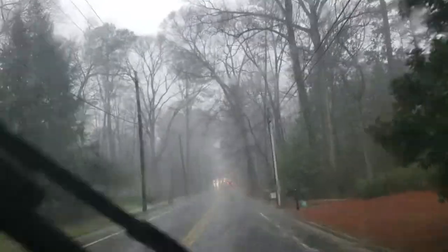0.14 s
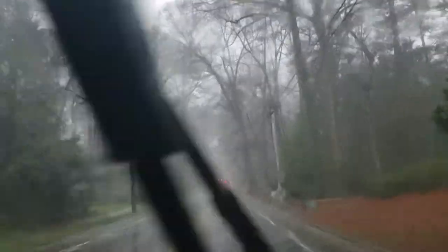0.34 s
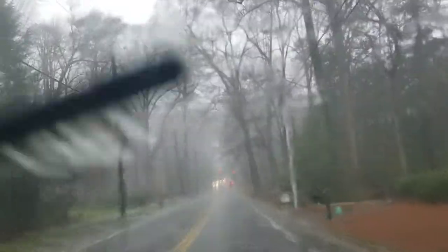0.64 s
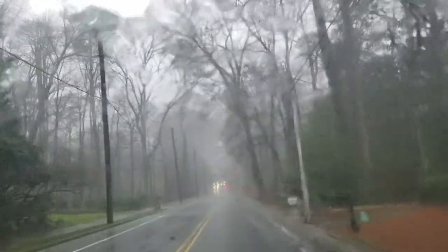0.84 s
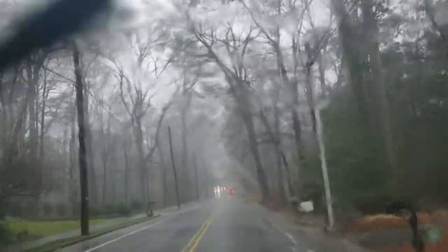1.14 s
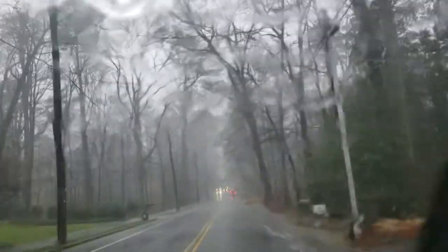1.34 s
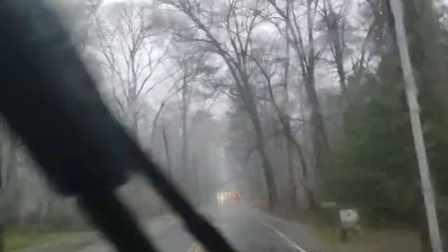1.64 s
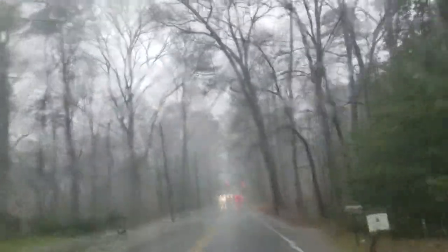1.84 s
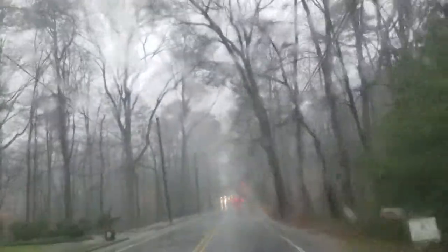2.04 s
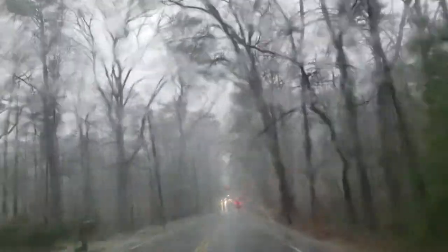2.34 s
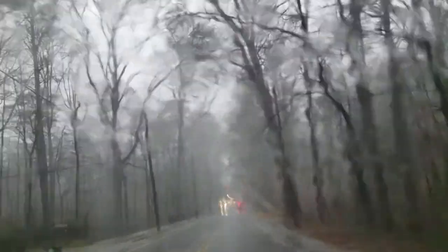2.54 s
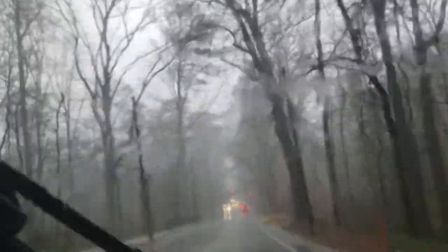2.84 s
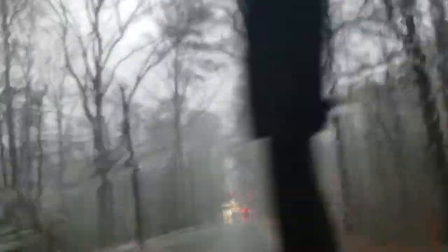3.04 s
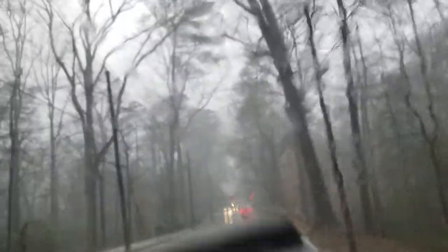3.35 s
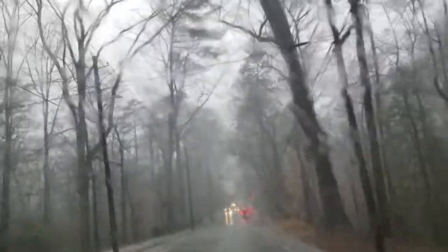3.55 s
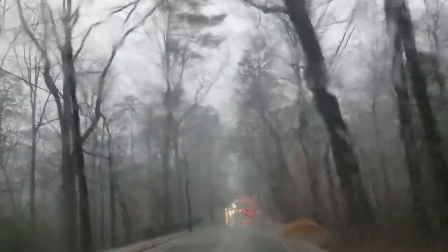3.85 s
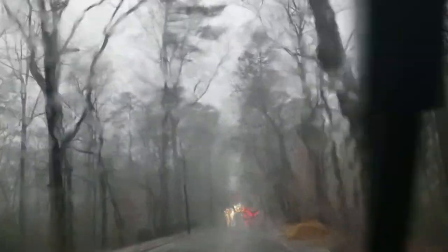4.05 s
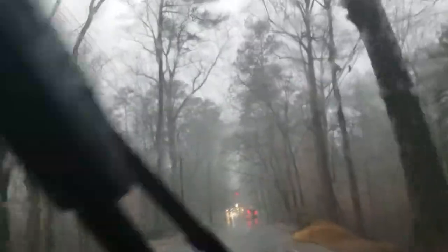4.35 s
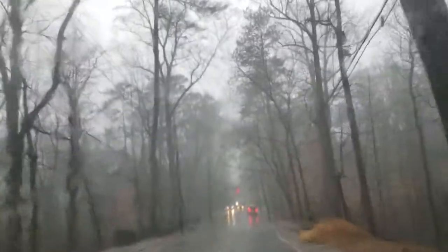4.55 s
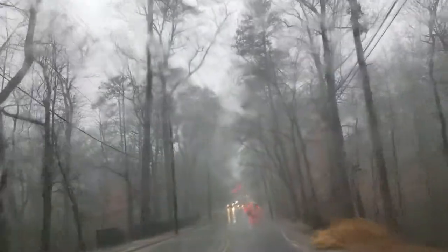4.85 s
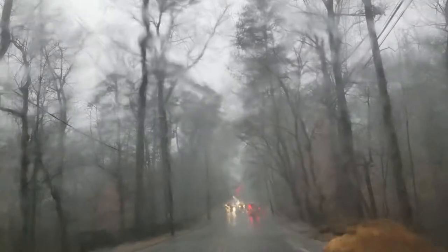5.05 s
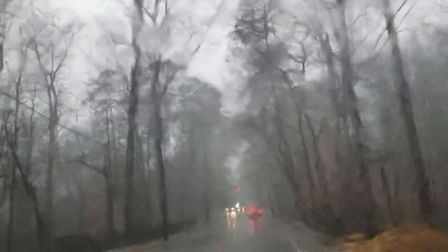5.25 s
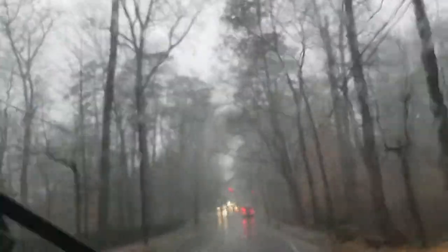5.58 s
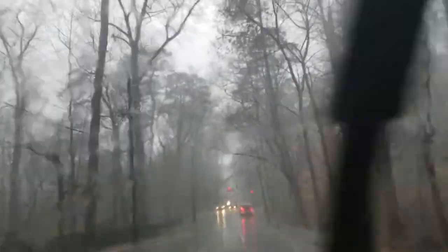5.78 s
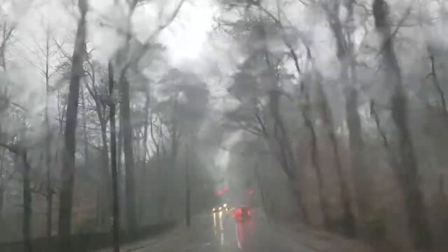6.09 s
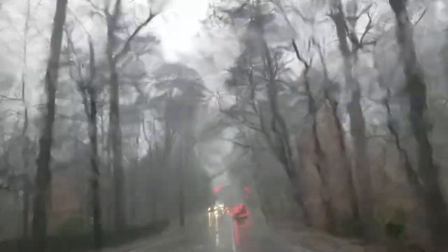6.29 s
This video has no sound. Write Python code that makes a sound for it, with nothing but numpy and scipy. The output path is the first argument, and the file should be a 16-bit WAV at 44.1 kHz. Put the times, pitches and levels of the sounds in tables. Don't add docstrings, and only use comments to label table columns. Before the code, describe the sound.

Heard inside a car driving a wet wooded road: fine rain patters in gusts on the windshield over boomy road rumble and tyre hum. A faint wiper blade groan comes early, then soft low wiper knocks. From about two and a half seconds fat drops crack sharply on glass and thud on the roof, thickly, until the end thins out as a low drone sinks with slowing speed.

```python
import sys
import numpy as np
from scipy import signal
from scipy.fft import irfft
from scipy.io import wavfile
from scipy.ndimage import uniform_filter1d, minimum_filter1d

SR = 44100
rng = np.random.default_rng(int(sys.argv[2]) if len(sys.argv) > 2 else 0)


def gain_from_db(level_db):
    decades = np.asarray(level_db, float) / 20
    return 10 ** decades


def int16_out(signal):
    q = np.round(np.clip(np.atleast_2d(signal).T, -1, 1) * 32767)
    wavfile.write(sys.argv[1], SR, q.astype(np.int16))


N = 283122
TIME = np.arange(N) / SR
PORT_LAG = 22

# f/Hz, density/dB per Hz
GLASS_COLOUR = [(150, -59), (250, -9.5), (379, -10), (683, -9.5), (1210, -10), (1710, -10.5), (2980, -4.5),
                (4430, -7), (5460, -17.5), (7450, -17.5), (9180, -21.5), (12100, -12.5), (13600, -20),
                (15700, -17)]


def patter(per_s=700, spread_db=4.5, wash_db=-6):
    # t/s, level/dB
    shower = [(0, -37), (.39, -32.5), (.45, -42.5), (.72, -39.5), (.78, -44.5), (.94, -46), (1.03, -41),
              (2.38, -36), (2.9, -34.5), (3.0, -41), (5.03, -38.5), (5.11, -32), (5.62, -33), (5.73, -38.5),
              (5.81, -31), (6.09, -28.5), (6.2, -39), (6.42, -39.5)]
    # t/s, swell/dB, half length/s
    sheets = [(0.56, 4.5, 0.12), (0.474, -3.5, 0.044), (.9, -2, 0.062), (1.34, -5.5, 0.043),
              (1.402, 3, 0.031), (3.507, -2, .05), (1.763, 3, 0.095), (2.09, 3.5, 0.095), (2.49, 7, 0.1),
              (2.92, 1, 0.1), (3.107, 6, .11), (3.342, 8, 0.08), (3.692, 1.5, 0.19), (3.906, 7, 0.048),
              (4.036, 6.5, 0.11), (4.484, 8, .05), (4.62, 4.5, .1), (4.718, 3.5, 0.086), (4.92, 9, 0.14),
              (5.328, 2, 0.28)]
    level_db = follow(shower)[0]
    for s, swell_db, half_s in sheets:
        level_db = level_db + swell_db * np.clip(1 - abs(TIME - s) / half_s, 0, 1)

    shapes = splats(count=24, crack_s=0.0011, ring_db=-10.5, spot_db=3)
    size = gain_from_db(spread_db * np.minimum(rng.exponential(1, N), 3))
    hits = size * (rng.random(N) < per_s / SR)
    spot = rng.integers(0, len(shapes), N)
    near = np.zeros((2, N))
    for k, shape in enumerate(shapes):
        near += signal.oaconvolve((hits * (spot == k))[None], shape, axes=1)[:, :N]
    wash = steady(GLASS_COLOUR, patchy_db=2.44, lag=PORT_LAG)
    body, fizz = split(evened(near) + gain_from_db(wash_db) * wash, hz=5000)
    drum, body = split(body, hz=1080)

    flicker_db, span = 1.5, round(0.0035 * SR)
    clumps = uniform_filter1d(rng.standard_normal(N), size=span)
    clumps = evened(uniform_filter1d(clumps, size=span))
    fizz = fizz * gain_from_db(flicker_db * clumps)
    body = body * gain_from_db(0.56 * flicker_db * clumps)

    drum_db = 1 - 0.1 * (level_db + 29)
    bright_db = 0.28 + 0.17 * (level_db + 47.5)
    return gain_from_db(level_db + 3.0) * (body + gain_from_db(drum_db) * drum + gain_from_db(bright_db) * fizz)


def fat_drops(gain_db=-3.5, thud_db=-8, thud_spread_db=6.0):
    s, peak_db, bright_db = np.transpose(all_drops())[..., None, None]
    shapes = splats(count=len(s), crack_s=.0006, ring_db=-20, spot_db=3)
    body, fizz = split(shapes, hz=5200)
    thud, body = split(body, hz=1085)
    body, fizz, thud = (part / part[..., :200].std((1, 2), keepdims=True) for part in (body, fizz, thud))

    place, depth = rng.random((2, len(s), 1, 1)) - .5
    crack = body + gain_from_db(bright_db) * fizz
    thud = thud * gain_from_db(thud_db - 0.01 * (peak_db + 22) + thud_spread_db * depth)
    pan = gain_from_db(np.array([[2], [-2]]) * place)
    peak = abs(crack.mean(1, keepdims=True)).max(2, keepdims=True)
    drops = (crack + thud) * pan * gain_from_db(peak_db + gain_db) / peak
    out = np.zeros((2, N))
    for start_s, drop in zip(s.ravel(), drops):
        add(out, start_s, drop)
    return out


def all_drops():
    # t/s, peak/dB, brightness/dB
    fat = [(.4445, -13.5, -1), (.5745, -14.5, 0.5), (.6369, -16, 2), (.8805, -17, 4), (1.471, -21, 11),
           (1.7019, -20, 15), (2.6154, -3, 3), (2.8117, -9, 4.5), (3.0214, -8.5, -0.5),
           (3.5283, -5.5, 3), (3.6784, -0.5, 5), (3.8949, -12.5, 4.5), (4.092, -7.5, -0.5),
           (4.1334, -12, 3), (4.2644, -4.5, 6.5), (4.4449, -7, 1.5), (4.6767, -6, 5),
           (4.7695, -11, 1.5), (4.953, -6, 7), (5.1044, -7, -1), (5.1217, -6, 7), (5.2893, -12, 1),
           (5.3948, -7.5, 0), (5.4165, -9, 9), (5.5584, -9, 6), (5.6707, -8.5, 15), (5.7946, -6.5, .5),
           (5.8146, -0.5, -3.5), (5.9493, -22, -3), (6.277, -15, 9),
           (0.178, -11, -9), (.666, -12.5, 0), (0.6904, -18, -3), (0.7228, -14.5, -4),
               (1.0276, -17.5, -5), (2.3348, -6.5, -0.5), (2.7032, -5.5, -3), (2.767, -16, -2.5),
               (2.9119, -8.5, -6), (3.314, -12, -11), (3.445, -8.5, -7), (3.6084, -10, -3),
               (3.648, -7.5, -8), (3.779, -14.5, 0.5), (3.973, -8, -7), (4.0407, -8, -4.5),
               (4.0727, -17, -6), (4.1775, -15, -7.5), (4.318, -9.5, 0.5), (4.3861, -10, 2),
               (4.544, -14.5, -5), (4.5794, -6.5, -4), (4.7972, -14, -5), (4.8939, -5, -1.5),
               (4.9396, -16, -7), (5.0404, -12, -8), (5.091, -15, -21), (5.4328, -8, -6.5),
               (5.9072, -7.5, -5), (6.3835, -16, 1)]
    # t/s, peak/dB, brightness/dB, gap to second half/s
    twins = [(2.4762, -6, 7.5, 0.0059), (2.5952, -9.5, -6, 0.0067), (2.6315, -12, -5.5, 0.0067),
             (2.8396, -12, -2.5, .005), (2.8872, -12, -3, 0.0093), (2.963, -10.5, -10, .0077),
             (3.7058, -9.5, 0.5, .006), (3.993, -11, -2, 0.008), (4.4689, -6.5, -1.5, .0072),
             (4.9251, -11.5, -4, .0057), (4.9724, -12, -2, 0.0097), (5.6571, -5, 3, 0.0055),
             (5.7498, -7.5, 4.5, 0.0059)]
    # t/s, peak/dB
    light = [(.017, -23), (0.7073, -18), (0.7387, -18.5), (.792, -19.5), (0.9603, -24), (2.9218, -11.5),
             (3.027, -17), (3.3492, -19), (3.389, -18.5), (3.563, -16), (3.6011, -19), (3.738, -19),
             (3.7672, -21), (3.7956, -13), (3.9481, -17), (3.9593, -14.5), (4.1472, -13.5), (4.204, -19),
             (4.2196, -16.5), (4.2788, -20), (4.437, -17), (4.631, -17), (4.746, -20), (5.2645, -22),
             (5.3254, -8), (5.378, -8), (5.46, -11), (5.5796, -30), (5.831, -18), (5.978, -24)]
    # t/s, rate/dB
    canopy = [(0, -6), (.8, -9), (2.2, -12), (2.6, 0), (5.0, 0.5), (5.2, -4), (6.42, -9)]
    second_db, strays, stray_db = 1.5, 40, -22
    halves = [(s + k * gap_s, db + k * second_db, bright_db)
              for s, db, bright_db, gap_s in twins for k in (0, 1)]
    drips = [(s, db, 12.0 * (tone - .5)) for (s, db), tone in zip(light, rng.random(len(light)))]
    when, size, tone = rng.random((strays, 3)).T
    fallen = np.cumsum(gain_from_db(follow(canopy)[0]))
    stray_s = np.interp(when * fallen[-1], fallen, TIME)
    stray_rows = list(zip(stray_s, stray_db + 3.4 * (size - .5), 9.0 * (tone - .5)))
    return fat + halves + drips + stray_rows


def splats(count, crack_s, ring_db, spot_db):
    # f/Hz, t60/s
    pane_t60 = [(300, 0.13), (1000, 0.086), (3000, 0.083), (8000, 0.054), (15000, 0.049)]
    t = np.arange(2560) / SR
    hz, z = ports(GLASS_COLOUR, len(t), count=count, lag=PORT_LAG)
    modes = uniform_filter1d(rng.standard_normal((count, len(hz))), size=56, axis=1)
    z = z * gain_from_db(spot_db * evened(modes).T)
    edges_hz = np.geomspace(200, 20000, 7)
    out = np.zeros((2, len(t), count))
    for lo, hi in zip(edges_hz, edges_hz[1:]):
        band = irfft(z * ((hz >= lo) & (hz < hi))[:, None], axis=1)
        rise = 1 - np.exp(-t / (.9 * crack_s + .4 / lo))
        crack = np.exp(-t / (crack_s + 0.19 / lo))
        ring = gain_from_db(ring_db - 60 * t / read(pane_t60, np.sqrt(lo * hi)))
        out += band * (rise * (crack + ring))[:, None]
    return np.moveaxis(out, 2, 0)


def wiper(t60_s=0.16, rise_s=0.0027, clack_db=-12, clack_t60_s=0.038):
    # t/s, peak/dB, f/Hz
    knocks = [(1.379, -11.5, 102), (1.43, -15.5, 57), (1.47, -14.5, 97), (1.498, -10, 60), (1.553, -13, 85),
              (1.631, -15, 80.7), (1.919, -16.5, 75.2), (1.986, -14.5, 53.8), (2.119, -12, 57.5),
              (2.785, -13, 80.5), (2.81, -20, 59.2), (2.849, -11, 110), (2.889, -17, 56.5),
              (2.953, -11.5, 65.5), (3, -19, 78.3), (3.08, -12, 61), (3.129, -14, 49.2)]
    out, t = np.zeros((2, N)), np.arange(6000) / SR
    for s, db, hz in knocks:
        knock = np.sin(2 * np.pi * hz * t * (1 - 0.67 * t))
        knock = knock * (1 - np.exp(-t / rise_s)) * gain_from_db(-60 * t / t60_s)
        clack = sum(np.sin(2 * np.pi * mode_hz * t) for mode_hz in rng.uniform(202, 515, size=3))
        knock = knock + gain_from_db(clack_db - 60 * t / clack_t60_s) * (1 - np.exp(-t / 0.0025)) * clack
        add(out, s, gain_from_db(db) * knock / abs(knock).max() * gain_from_db([[1.2], [-1.2]]))
    return out


def groans(edge_s=0.018, sag=0.036):
    # start/s, length/s, f/Hz, level/dB
    rubs = [
        (0.24, .11, 251, -32),
        (0.625, 0.24, 252.7, -39.5),
    ]
    corners = []
    for s, length_s, hz, db in rubs:
        end_s, end_hz = s + length_s, hz * (1 - sag)
        corners += [(s - edge_s, hz, -60), (s, hz, db), (end_s, end_hz, db), (end_s + edge_s, end_hz, -60)]
    return hum(*follow(corners), width_hz=11, clean=4.6)


def tyres():
    # t/s, f/Hz, level/dB
    cavity = [(0, 151, -32), (.8, 151, -35), (2, 148.3, -30.5), (2.7, 153.4, -34.5), (4, 149, -31.5),
              (5.2, 152.9, -29.5), (5.6, 149.7, -31.5), (6.42, 148, -34)]
    return hum(*follow(cavity), width_hz=25.4, clean=0.85)


def driveline():
    # t/s, f/Hz, level/dB
    drone = [(3.4, 140.5, -62), (4.4, 137.9, -32.5), (5.3, 130, -27.5), (5.55, 129.2, -32.5),
             (5.75, 126.9, -25), (6.1, 122.1, -23.5), (6.42, 122.4, -25)]
    return hum(*follow(drone), width_hz=10, clean=4)


def hum(hz, db, width_hz, clean):
    r = np.exp(-np.pi * width_hz / SR)
    noise = rng.standard_normal((4, N))
    for _ in range(2):
        noise = signal.lfilter([1 - r], [1, -r], noise)
    a, b, c, d = noise
    wander = clean + evened(a) + 1j * evened(b)
    other = 0.38 * (evened(c) + 1j * evened(d))
    turn = np.exp(2j * np.pi * np.cumsum(hz) / SR)
    pair = np.array([1.25 * wander * turn, (wander * np.exp(.3j) + other) * 0.82 * turn])
    return gain_from_db(db) * evened(pair.real)


def road(steadied=0.62):
    # f/Hz, density/dB per Hz
    boom_colour = [(8.8, -38), (15, -29), (42, -5.5), (64, 2), (97, -5), (135, -12), (200, -25), (260, -50),
                   (440, -120)]
    # f/Hz, density/dB per Hz
    roar_colour = [(71, -9), (120, -1.5), (158, -5), (222, -7), (307, -11.5), (479, -22.5), (731, -25),
                   (932, -29), (1500, -47), (1950, -59), (3300, -120)]
    # t/s, roar level/dB
    roar_level = [(0, -34.5), (.18, -37), (.64, -33.5), (1.2, -36.5), (1.48, -30.5), (2.38, -37), (2.9, -31.5),
                  (3.97, -35), (5.11, -34), (5.24, -36.5), (5.5, -36), (5.93, -33), (6.0, -43), (6.42, -36.5)]
    boom = steady(boom_colour, patchy_db=0.5)
    boom = boom / (uniform_filter1d(boom.mean(0) ** 2, size=2200) + .05) ** (steadied / 2)
    roar = steady(roar_colour, patchy_db=1.5)
    return gain_from_db(jolted() + 1.5) * evened(boom) + gain_from_db(follow(roar_level)[0] + 3.0) * roar


def jolted(rise_db_per_s=240, fall_db_per_s=61, smooth_road_db=-34):
    # t/s, rumble level/dB, hold/s
    jolts = [(0, -22.5, 0.017), (0.202, -21, 0.053), (0.456, -24, 0.31), (0.859, -20.5, .01),
             (1.11, -24.5, 0.026), (1.375, -23.5, 0.24), (1.615, -25, 0.27), (2.016, -23.5, 0.081),
             (2.22, -27, 0.18), (2.446, -30.5, 0.22), (2.795, -24, 0.4), (3.2, -28.5, 0.32),
             (3.605, -29, 0.51), (4.2, -28.5, .25), (4.475, -27, 0.12), (4.814, -26.5, 0.55),
             (5.49, -27, 0.23), (5.72, -23.5, 0.15), (6.096, -26.5, .02), (6.314, -28, .01)]
    s, db, hold_s = np.transpose(jolts)[..., None]
    t = TIME[::64]
    rise_db = rise_db_per_s * np.maximum(s - t, 0)
    fall_db = fall_db_per_s * np.maximum(t - s - hold_s, 0)
    each_db = db - rise_db - fall_db
    return np.interp(TIME, t, np.maximum(each_db.max(0), smooth_road_db))


def steady(points, patchy_db, lag=0):
    frames = N // 512 + 5
    hz, z = ports(points, 2048, count=frames, lag=lag)
    patches = rng.standard_normal((frames, len(hz)))
    patches = uniform_filter1d(patches, size=6, axis=0)
    patches = evened(uniform_filter1d(patches, size=12, axis=1)).T
    out = signal.istft(z * gain_from_db(patchy_db * patches), nperseg=2048, noverlap=1536)[1][:, :N]
    return out / np.sqrt(np.mean(out.mean(0) ** 2))


def ports(points, length, count, lag=0):
    # f/Hz, left-right/dB
    lean_db = [(60, 1.5), (130, 3.5), (290, 2), (640, 3), (1410, 0), (3100, 6.5), (6820, 6), (15000, 7.5)]
    # f/Hz, coherence/1
    likeness = [(40, 1), (120, 0.8), (250, 0.95), (450, 0.51), (800, 0.35), (2500, 0.34), (6000, 0.018)]
    hz = np.fft.rfftfreq(length, 1 / SR)
    a, b, c, d = rng.standard_normal((count, len(hz), 4)).T
    same = np.clip(read(likeness, hz), 0, 1)[:, None]
    lean = gain_from_db(read(lean_db, hz)[:, None] / 2)
    late = np.exp(-2j * np.pi * hz * np.clip((hz - 350) / 550, 0, 1) * lag / SR)[:, None]
    left = a + 1j * b
    right = same * late * left + np.sqrt(1 - same ** 2) * (c + 1j * d)
    return hz, np.array([left * lean, right / lean]) * gain_from_db(read(points, hz))[:, None]


def split(x, hz):
    low = signal.butter(3, hz, fs=SR, output="sos")
    high = signal.butter(3, hz, "high", fs=SR, output="sos")
    return signal.sosfilt(low, x), signal.sosfilt(high, x)


def evened(x):
    return x / np.sqrt(np.mean(x ** 2) + 1e-20)


def read(points, hz):
    f, value = np.transpose(points)
    return np.interp(np.log(hz + 1), np.log(f + 1), value)


def follow(rows):
    s, *columns = np.transpose(rows)
    return [np.interp(TIME, s, c) for c in columns]


def add(mix, s, sound):
    part = mix[:, round(s * SR):][:, :sound.shape[1]]
    part += sound[:, :part.shape[1]]


def scene():
    return patter() + fat_drops() + wiper() + groans() + tyres() + driveline() + road()


def hushed(x, hush_db=4.5, ahead_s=0.013, over_db=13):
    top = signal.oaconvolve(x, signal.firwin(129, 5200, pass_zero=False, fs=SR)[None], "same")
    now_db = 10 * np.log10(abs(uniform_filter1d((top ** 2).mean(0), size=120)) + 1e-12)
    span = round(ahead_s * SR)
    soon_db = -minimum_filter1d(-now_db, size=span, origin=-(span // 2))
    cut_db = hush_db * np.clip((soon_db - now_db - over_db) / 4, 0, 1)
    return x - top * (1 - gain_from_db(-uniform_filter1d(cut_db, size=60)))


def low_pass(x):
    return signal.sosfilt(signal.butter(12, 15800, fs=SR, output="sos"), x)


def record(dry):
    heard = signal.sosfilt(signal.butter(2, 30, "high", fs=SR, output="sos"), dry)
    knee, room = .6, .33
    rounded = np.sign(heard) * (knee + room * np.tanh((abs(heard) - knee) / room))
    heard = np.where(abs(heard) > knee, rounded, heard)
    edge = signal.firwin(301, 16050, window=("kaiser", 9), fs=SR)
    return low_pass(signal.oaconvolve(hushed(heard), edge[None], "same"))


dry = scene()
out = record(dry)
int16_out(out)
```